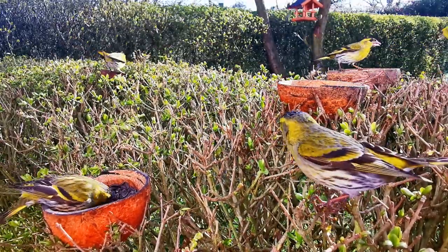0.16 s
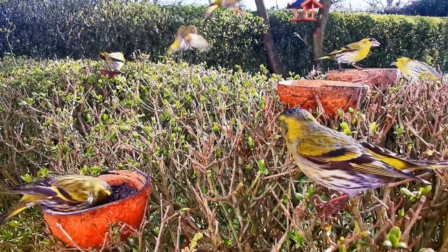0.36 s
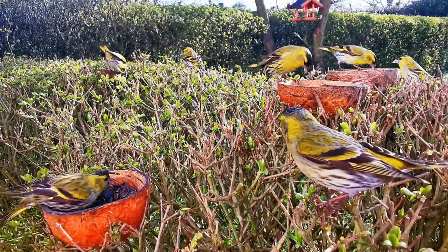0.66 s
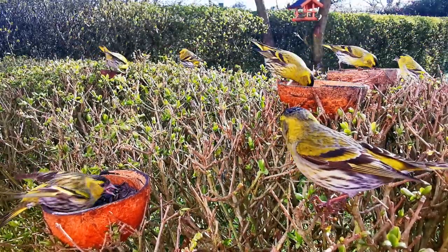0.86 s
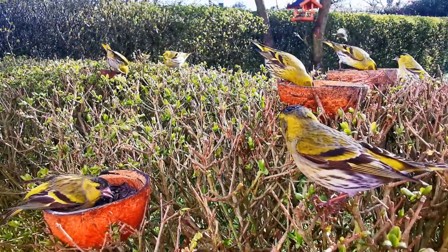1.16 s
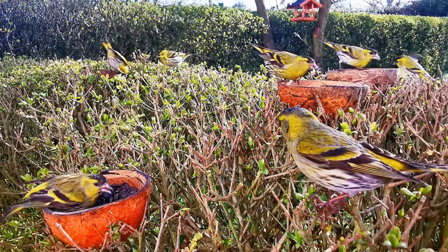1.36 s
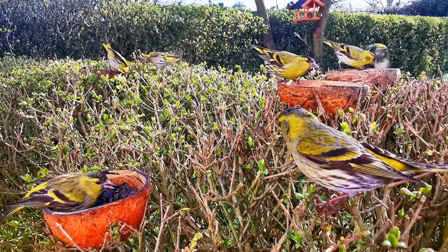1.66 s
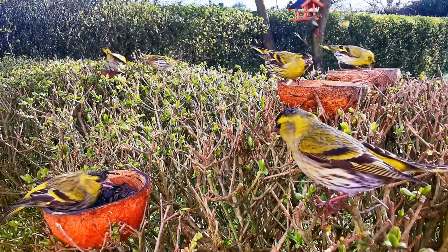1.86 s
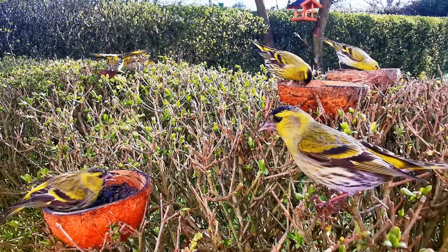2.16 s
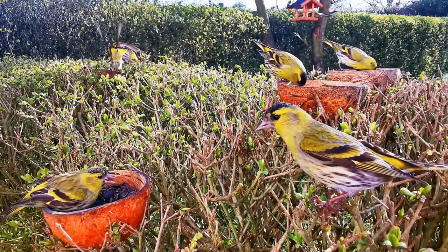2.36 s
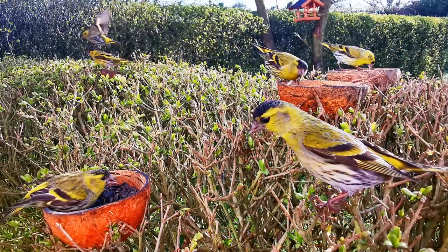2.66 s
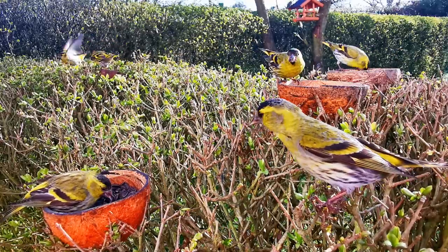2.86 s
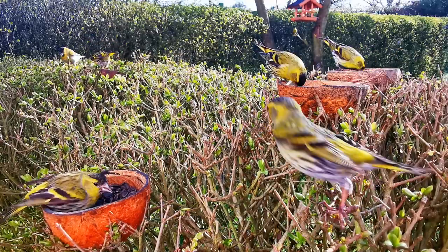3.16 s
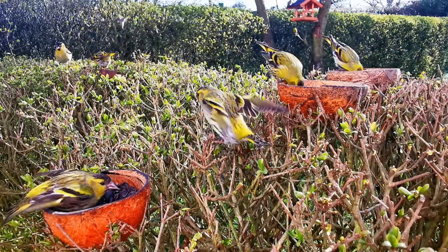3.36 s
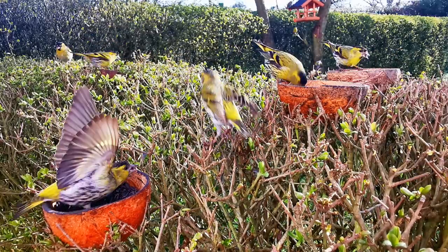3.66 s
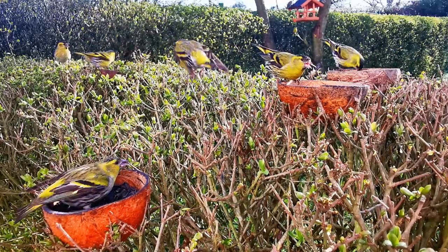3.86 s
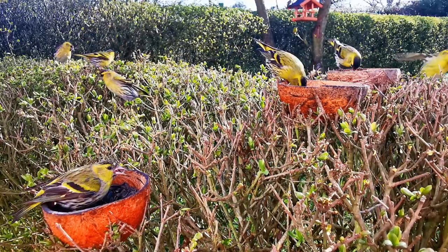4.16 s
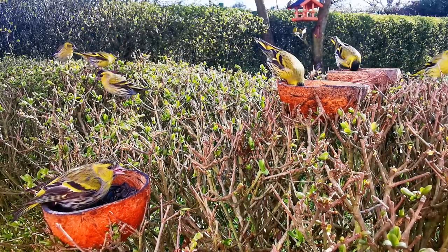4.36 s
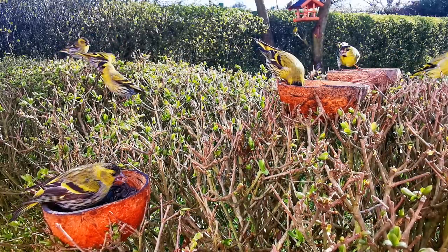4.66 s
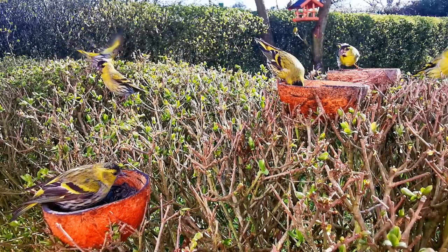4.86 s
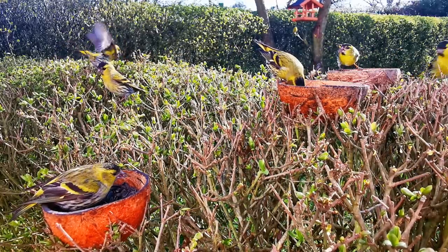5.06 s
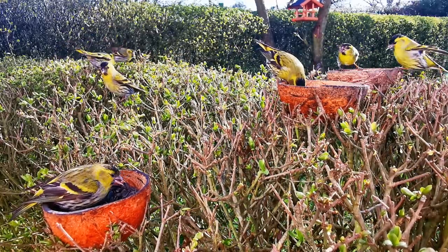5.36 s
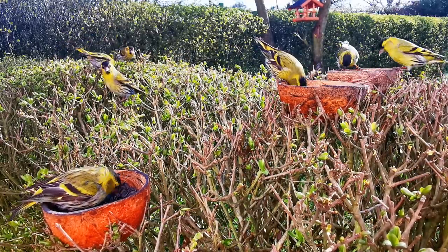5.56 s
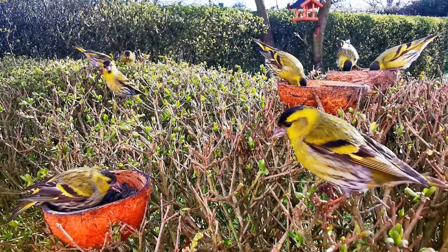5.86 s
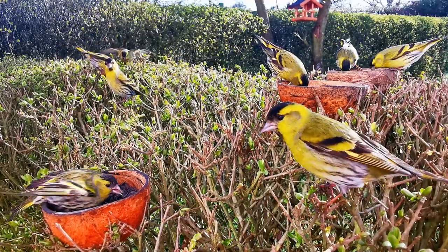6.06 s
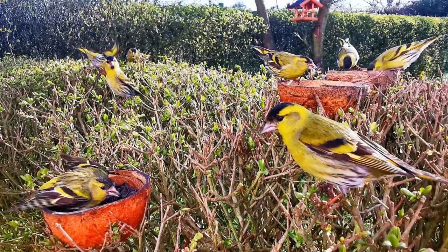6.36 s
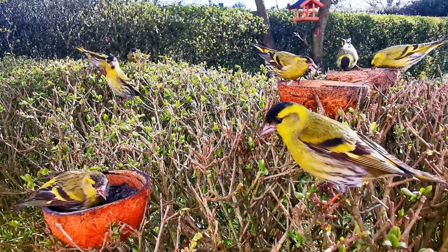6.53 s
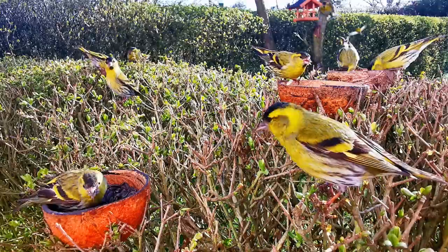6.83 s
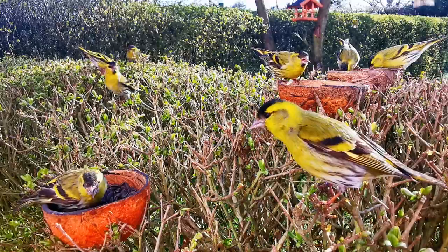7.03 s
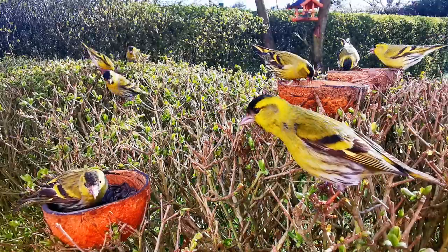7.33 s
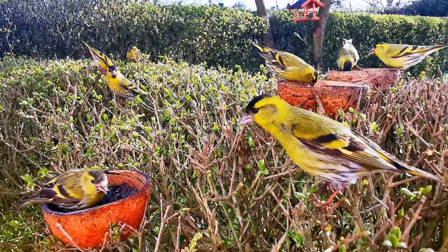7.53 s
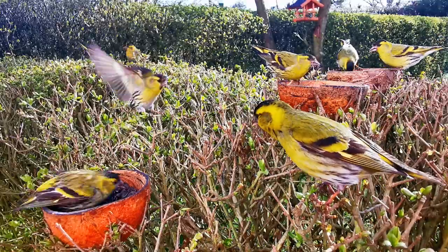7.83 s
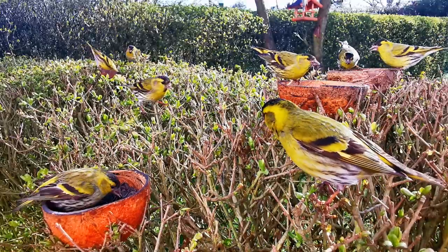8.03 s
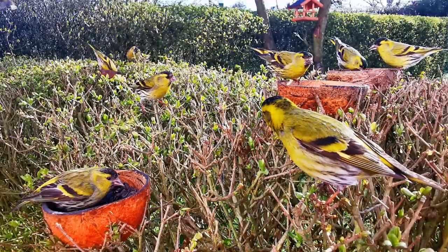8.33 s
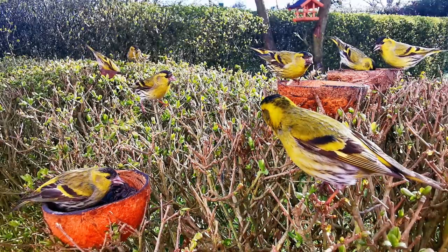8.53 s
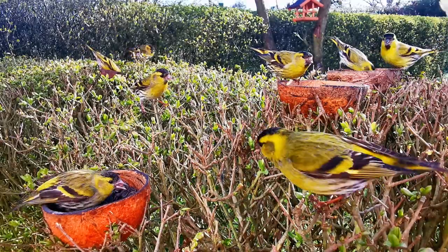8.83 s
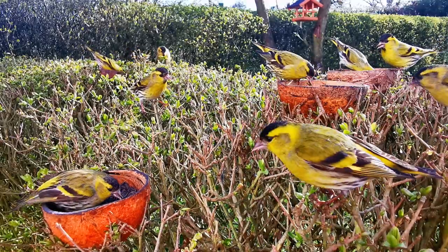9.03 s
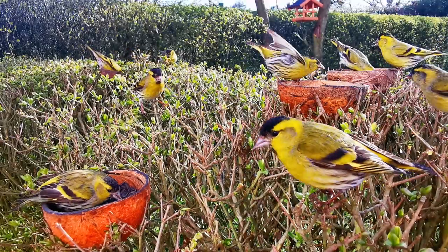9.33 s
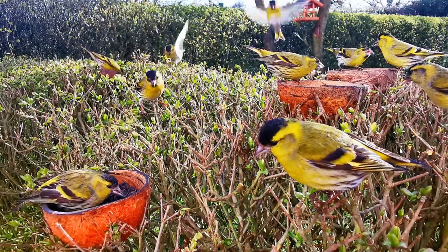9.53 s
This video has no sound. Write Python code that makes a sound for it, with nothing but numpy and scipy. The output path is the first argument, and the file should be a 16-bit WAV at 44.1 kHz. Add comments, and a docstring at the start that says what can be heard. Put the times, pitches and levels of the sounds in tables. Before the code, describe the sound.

Small finches feed close by on a garden hedge, over soft rustling of feathers and leaves, faint distant twitter and a light low wind rumble on the microphones. It opens with a dull flutter of wings and two harsh rasps. Rapid trills of high falling chirps run from 0.4 to 0.9 seconds and from 1.3 to 2.7, ending in thin gliding whistles and more flapping. Seed husks crack with tiny sharp snaps, clustered around 3.4 to 3.9 seconds and 5.6 to 6.2, the sharpest near 5.9. An animal wails faintly far off around 3.5, 4.5 and 6.5 seconds. Short dry calls and softer chirps scatter from 4.5 onward. A bright whistle stands out at 7.3, followed by wingbeats, a small gust, whistles and another trill with seed clicks from 8.5 to 9. Dry calls and wing swishes close it near 9.7. The calls carry a slight short echo.

```python
"""Finches at a garden feeder

Small finches crowd a feeder on a hedge, heard by two spaced microphones in a light wind. Oscillation of
the syrinx gives trills of falling chips and whistles, often from both of its sides at once; its flutter
chops the breath into rasps. Cracked seed husks ring briefly and beating wings push puffs of air.
An animal wails far off, and the hedge and house walls reflect the calls."""
import sys
import numpy as np
from scipy import signal
from scipy.io import wavfile
from scipy.ndimage import uniform_filter1d

SR = 44100
rng = np.random.default_rng(int(sys.argv[2]) if len(sys.argv) > 2 else 0)


def wrap_up_sound(samples):
    """Save the sound to the file named by the first command line argument, as 16-bit audio."""
    columns = np.atleast_2d(samples).T
    # keep every value between -1 and 1, then stretch to whole-number steps
    tamed = np.clip(columns, -1, 1)
    steps = np.round(tamed * 32767).astype(np.int16)
    wavfile.write(sys.argv[1], SR, steps)


N = 427329
T = np.arange(N) / SR

# Breeze on the microphones: t/s, low eddies/dB, brighter rumble/dB
BREEZE = [(0.0, -53, -56), (0.78, -65.5, -74), (1.78, -59.5, -63), (2.19, -62, -66.5), (2.62, -58.5, -60.5),
          (3.75, -66.5, -71), (4.07, -61.5, -61), (4.37, -63.5, -75), (5.34, -64.5, -80.5),
          (6.74, -61.5, -62), (7.31, -61.5, -67), (7.72, -47.5, -59), (8.39, -59.5, -72),
          (9.69, -59.5, -74)]
# Rushes of air from gusts and nearby wings: start/s, duration/s, low eddies/dB, brighter rumble/dB
RUSHES = [(-.15, 0.44, -61, -49), (0.247, 0.17, -57, -64), (0.437, 0.21, -59, -54.5),
          (1.287, 0.29, -59, -68), (1.595, 0.48, -67, -61.5), (2.45, 0.55, -59, -63.5),
          (3.332, 0.15, -60.5, -91), (3.826, 0.23, -58.5, -54.5), (4.004, 0.31, -50, -54),
          (5.57, 0.39, -55, -98), (6.2, 0.5, -66.5, -63), (6.678, 0.48, -56.5, -61.5),
          (7.203, 0.21, -64, -96), (7.373, 0.54, -47.5, -69), (7.89, 0.36, -50, -55),
          (8.404, 0.27, -69, -60.5), (8.74, 0.42, -56, -70), (9.267, 0.2, -58, -87),
          (9.527, 0.32, -62, -53)]
# Activity of the flock: t/s, rustle of feathers and leaves/dB, distant twitter/dB
BUSTLE = [(0.0, -42.5, -66), (0.16, -59.5, -88), (0.6, -62.5, -97), (0.9, -72, -92), (1.4, -62.5, -67.5),
          (2.3, -63.5, -68), (2.67, -58.5, -60), (3.1, -70, -84), (4.02, -63, -86), (4.4, -71, -77),
          (5.2, -70.5, -75.5), (5.8, -64, -70.5), (6.15, -68.5, -88.5), (6.45, -68.5, -69.5),
          (7.3, -64, -78.5), (7.77, -53, -67), (8.0, -61, -75.5), (8.36, -63, -74.5), (8.85, -63, -72.5),
          (9.1, -67, -97), (9.55, -62, -70.5), (9.69, -57, -67)]
# Spectrum of the rustle: f/Hz, relative spectral density/dB
RUSTLE_SPECTRUM = [(500, 3), (900, -11), (1500, -19.5), (2500, 8.5), (5000, -15.5), (8000, -6.5),
                   (11000, -2), (15500, -9)]
# Distant wails: start/s, duration/s, top f/Hz, top level/dB
WAILS = [(3.429, 0.6, 714, -57), (4.458, 0.57, 689, -58.5), (6.393, .58, 689, -60), (6.74, .36, 731, -60.5),
         (8.8, 0.43, 720, -69.5)]
# Arch of every wail: fraction of duration, fraction of top frequency, level re top/dB
WAIL_ARCH = [(0, .85, -17), (.11, .955, -5), (.4, 1.0, 0), (.7, .97, -3), (.92, .89, -9), (1, .82, -18)]
# Single wing strokes close by: t/s, level/dB
WING_STROKES = [(0.1054, -56), (0.3725, -52), (0.6394, -59), (1.3974, -52), (2.0822, -58), (2.5405, -54.5),
                (2.615, -50.5), (2.6707, -54), (2.7232, -51.5), (2.7721, -56), (4.1081, -57),
                (4.138, -55.5), (5.655, -54), (5.7117, -51.5), (5.773, -52), (5.8277, -52.5),
                (6.4443, -51.5), (7.6116, -51.5), (7.829, -47.5), (8.0366, -55.5), (8.1194, -63),
                (9.248, -59), (9.3723, -49.5), (9.4918, -63), (9.6163, -47)]
# Flapping at take-off and landing: first stroke/s, last stroke/s, first level/dB, last level/dB
FLAP_RUNS = [(0.068, 0.106, -37, -42.5), (0.505, 0.583, -55, -70), (1.642, 1.78, -65, -61),
             (1.889, 1.93, -74, -64), (2.702, 2.78, -52, -58), (3.836, 3.87, -60, -69),
             (4.001, 4.24, -61, -68), (6.531, 6.613, -59, -66), (7.433, 7.517, -54, -50.5),
             (7.586, 7.706, -48, -77), (8.062, 8.102, -67, -58), (8.539, 8.703, -63, -61)]
# Husks cracking and beaks tapping the dish: t/s, level/dB, f/Hz, left minus right/dB
CRACKS = [(0.063, -43, 5470, -15), (0.637, -52, 11000, -10), (0.7002, -52, 10800, -15),
          (1.074, -43.5, 7760, -16), (2.0822, -52, 7650, -11), (2.7721, -56, 10700, -15),
          (2.856, -51.5, 10400, -17), (3.3932, -40, 9000, -10), (3.6196, -41, 10600, 5),
          (3.7803, -46.5, 9980, 6), (3.8437, -36.5, 6640, 6), (4.107, -49, 5480, 9),
          (5.5944, -53, 9820, -12), (5.6135, -37.5, 8700, -17), (5.6261, -34.5, 9100, -6),
          (5.646, -43, 5100, -6.0), (5.875, -29, 8500, 5), (6.0601, -60, 7740, -13),
          (6.1745, -36, 8800, -9), (6.6145, -44, 11300, -7), (8.2023, -36.5, 7100, -9),
          (8.7065, -48, 7350, 0.0), (8.742, -44.5, 6440, -1), (8.7847, -44.5, 9030, -7),
          (8.8262, -46, 7960, -16), (8.8827, -52, 10900, -19), (8.9466, -50.5, 8250, -17),
          (9.5492, -51, 11000, -28)]
# Throat resonances: f/Hz, bandwidth/Hz, gain/dB
THROAT_FORMANTS = [(1663, 334, -0.5), (2850, 440, 3.5)]
# Squabbling rasps: t/s at start, turn and end; beak level/dB at the same three;
# throat level/dB, left lag/ms, beak f/Hz, beak bandwidth/Hz
RASPS = [(0.0, 0.09, 0.087, -44.5, -53.5, -69, -41.5, -.2, 4320, 2100),
         (0.209, 0.295, 0.34, -52.5, -35.5, -38.5, -41, -.2, 4820, 1300),
         (2.332, 2.447, 2.52, -54, -47, -55, -87, -.4, 5100, 700),
         (5.191, 5.23, 5.27, -58, -59, -58, -75, .1, 4800, 1800),
         (6.72, 6.79, 6.88, -56.5, -54, -66, -65, .2, 4560, 1680)]
# Short dry "tet" calls: t/s, level/dB, beak f/Hz, relative throat level/dB
TETS = [(1.144, -60, 5740, 3.5), (2.1297, -46.5, 4770, -27.5), (2.907, -53, 3940, -21),
        (4.0233, -53.5, 4140, 1), (4.7865, -57.5, 4400, 3), (4.906, -55, 4600, -6),
        (5.018, -57.5, 4250, -6), (5.425, -52, 4100, -28), (5.491, -57, 4400, -24), (5.56, -56, 4540, -19),
        (5.7, -47.5, 3750, -23), (5.843, -46.5, 4030, -12), (5.918, -47, 4300, -18),
        (5.9993, -49.5, 4280, -8), (6.1963, -50, 4740, 0.5), (6.301, -64, 4620, -30),
        (6.4455, -47.5, 4900, -5), (6.47, -52, 4540, 3), (6.9481, -53, 4360, -6), (7.0194, -52, 4130, -25),
        (7.051, -56.5, 5109, 1), (7.089, -51.5, 4200, -7), (7.2235, -52, 4900, -28), (7.391, -53, 4570, -8),
        (7.473, -55, 4040, -2), (7.6191, -48.5, 4400, -8), (8.118, -42.5, 4800, 2), (8.266, -49, 4800, -5),
        (8.5909, -57, 4580, -25), (9.25, -44, 4070, -6), (9.3697, -43, 4400, -4.5), (9.4424, -54, 4800, -2),
        (9.483, -44.5, 4700, -1), (9.553, -49, 4400, -20), (9.6594, -57, 4210, -9)]
# Whistled glides: t/s at start, turn and end; f/Hz and then level/dB at the same three;
# left lag/ms, second partial/dB, third partial/dB
WHISTLES = [ (0.116, 0.128, 0.16, 3260, 3174, 3220, -67, -60, -73, 0, -27, -30),
            (2.127, 2.221, 2.31, 1887, 2382, 2500, -59, -53.5, -56.5, 0.32, 1, -8),
            (2.135, 2.181, 2.37, 2420, 2950, 3310, -50.5, -54, -43, 0.27, -10, -12),
            (2.325, 2.369, 2.49, 5830, 5030, 5020, -56, -51, -46.5, -.4, -42, -40),
            (2.42, 2.48, 2.5, 2780, 3670, 3820, -83, -55, -65, -0.022, -14, -25),
            (2.619, 2.641, 2.68, 6170, 5380, 5070, -58, -42.5, -60, .3, -15, -40),
            (2.636, 2.658, 2.67, 4100, 4300, 4272, -62, -38, -67, 0.07, -40, -40),
            (2.7, 2.7, 2.73, 5678, 5470, 5100, -57, -41, -71, .3, -35, -40),
            (3.592, 3.643, 3.77, 2390, 3260, 3600, -55, -58.5, -84, -0.41, -8, -32),
            (3.606, 3.655, 3.78, 2110, 2546, 2790, -66, -54.5, -72, -0.45, -3.5, -35),
            (4.041, 4.08, 4.09, 1243, 2000, 2000, -62.5, -68.5, -78, -0.54, 12.5, 4.5),
            (4.12, 4.15, 4.35, 2791, 2860, 2744, -78, -66, -67, 0.27, -40, -40),
            (4.82, 4.976, 5.14, 4110, 4230, 3930, -68, -70, -74, 0.19, -40, -40),
            (5.229, 5.287, 5.32, 3450, 4920, 5000, -56, -55, -70, .1, -40, -40),
            (5.24, 5.249, 5.275, 3120, 2864, 2270, -68, -62, -67, 0, -30, -30),
            (6.323, 6.372, 6.5, 3530, 3950, 3020, -61, -59.5, -60, .32, -26, -35),
            (6.324, 6.366, 6.4, 5300, 5570, 5749, -62, -58, -73, 0.3, -35, -40),
            (6.805, 6.831, 6.862, 3230, 4130, 5050, -57, -54, -62, 0.19, -40, -40),
            (6.842, 6.867, 6.885, 2450, 2420, 2420, -64, -57, -70, -0.12, -5, -21),
            (7.241, 7.298, 7.32, 3550, 4170, 4470, -69, -45.5, -70, .32, -57, -40),
            (7.242, 7.274, 7.315, 4820, 4755, 5590, -50, -37, -50, .32, -23, -40),
            (7.602, 7.764, 7.78, 4820, 4510, 4750, -52.5, -54, -75, .25, -32, -40),
            (7.932, 7.964, 8.0, 3330, 3460, 3379, -53, -67, -63, 0, -35, -40),
            (7.95, 7.952, 8.03, 6760, 6900, 6915, -75, -59, -78, 0, -25, -40),
            (8.14, 8.273, 8.29, 3997, 3730, 3890, -47, -52.5, -58, -.34, -23, -29),
            (8.281, 8.305, 8.335, 2000, 2030, 2220, -58, -44, -58, -.16, -4.5, -5),
            (8.33, 8.373, 8.39, 2250, 2700, 2820, -59, -44.5, -57, -0.14, -6.5, -19),
            (8.363, 8.379, 8.39, 1487, 1370, 1360, -62, -53, -78, -0.23, 3, -11),
            (8.437, 8.472, 8.48, 3700, 4349, 4600, -53, -60, -73, -0.072, -35, -40),
            (9.579, 9.604, 9.635, 1936, 2070, 2060, -67, -59.5, -74, -0.021, 10.5, 0),
            (9.652, 9.663, 9.688, 2520, 2840, 3140, -72, -63, -51, 0, -10, -28), ]
# Singer of each trill: from t/s, lead of chip onset/s, mean fall/(Hz/s), closing f/Hz,
# second partial/dB, third partial/dB
SINGERS = [(0.0, 0.01, 61500, 2440, -40, -50), (1.2, .006, 100100, 2235, -25.5, -23.5),
           (4.3, 0.0087, 79800, 2340, -42, -59), (5.2, 0.0096, 70200, 2250, -24, -45),
           (7.3, .01, 79300, 2270, -35, -43), (8.5, 0.0068, 84800, 2360, -29, -45)]
# Falling chips: t/s, level/dB, starting f/Hz
CHIPS = [(0.4193, -50.5, 3660), (0.4748, -40, 4310), (0.5487, -37.5, 4330), (0.622, -37, 4390),
         (0.701, -38, 4290), (0.7708, -48, 3900), (0.8664, -46.5, 4030), (1.3351, -46, 4590),
         (1.394, -41, 4540), (1.4492, -39, 4690), (1.5102, -40, 4470), (1.574, -40.5, 4460),
         (1.6355, -39.5, 4490), (1.6976, -39.5, 4450), (1.7614, -41, 4530), (1.829, -41.5, 4440),
         (1.901, -43, 4380), (1.973, -44, 4650), (1.99, -43.5, 4300), (2.0523, -46.5, 4540),
         (2.08, -46.5, 4600), (2.1424, -42, 4620), (2.202, -43.5, 4630), (2.2599, -41, 4530),
         (2.3244, -42, 4320), (2.3922, -41.5, 4570), (2.5099, -46.5, 4580), (2.5942, -46.5, 4710),
         (2.6122, -49, 4500), (2.6673, -46, 4840), (4.4545, -50, 4230), (4.5472, -47.5, 3910),
         (4.6561, -48.5, 3720), (5.322, -52, 3810), (5.434, -53.5, 3750), (5.677, -48, 4200),
         (5.7796, -45, 3930), (5.881, -49, 4190), (7.5257, -58, 4250), (7.6744, -48.5, 4250),
         (7.7512, -47, 4240), (7.8303, -45, 4380), (7.9184, -48, 4220), (8.566, -55, 4320),
         (8.6244, -50, 4260), (8.681, -50, 4200), (8.744, -48.5, 4300), (8.8064, -49.5, 4200),
         (8.8693, -48.5, 4010), (8.9362, -49.5, 4110), (9.011, -50.5, 3970)]

TOP_HZ = 16000


def undb(db):
    return 10 ** (np.asarray(db) / 20)


def unit(x):
    return x / np.sqrt(np.mean(x ** 2))


def band(x, hz, width):
    """Second-order resonance with unit gain at its centre."""
    return signal.lfilter(*signal.iirpeak(min(hz, .45 * SR), hz / width, SR), x)


def hiss(hz, width):
    """White noise shaped by one resonance, at unit RMS."""
    return unit(band(rng.standard_normal(N), hz, width))


def walk(rate):
    """Slow random modulation: values held for 1 / rate s and smoothed twice; spread near 1."""
    hold = int(SR / rate)
    steps = np.repeat(rng.standard_normal(N // hold + 1), hold)
    return 1.5 * uniform_filter1d(uniform_filter1d(steps, hold), hold)[:N]


def add(out, s, x):
    """Superposition: x joins out from time s."""
    i = max(int(s * SR), 0)
    out[..., i:i + x.shape[-1]] += x[..., :N - i]


def place(out, s, x, lag_ms):
    """Path difference: x reaches the left microphone lag_ms after the right."""
    add(out[0], s + max(lag_ms, 0) / 1000, x)
    add(out[1], s + max(-lag_ms, 0) / 1000, x)


def harmonic_glides(calls, traits, fade_s, waver, tremble_db):
    """Harmonic series on (t, f, level) contours, slightly modulated in frequency and amplitude."""
    out = np.zeros((2, N))
    drift = 1 + waver * walk(150)
    tremble = undb(tremble_db * (walk(60) + walk(400)) / np.sqrt(2))
    for call, (lag_ms, *partials_db) in zip(calls, traits):
        s, hz, db = np.transpose(call)
        span = slice(int(s[0] * SR), int(s[-1] * SR))
        t = T[span]
        pitch = uniform_filter1d(np.interp(t, s, hz), len(t) // 6, mode="nearest")
        phase = 2 * np.pi * np.cumsum(pitch * drift[span]) / SR
        partials = enumerate([0, *partials_db], 1)
        tone = sum(undb(d) * np.sin(k * phase) for k, d in partials if k * hz.max() < TOP_HZ)
        fade = np.clip(np.minimum(t - s[0], s[-1] - t) / fade_s, 0, 1)
        place(out, s[0], np.sqrt(2) * undb(np.interp(t, s, db)) * tone * fade * tremble[span], lag_ms)
    return out


def airflow(column, skew=1.09, sharpness=2.55):
    """Envelope of one layer of turbulence: the breeze plus rushes that swell and die away."""
    breeze = np.array(BREEZE)
    gain = undb(np.interp(T, breeze[:, 0], breeze[:, column]))
    for row in RUSHES:
        u = np.clip((T - row[0]) / row[1], 0, 1)
        gain += undb(row[column + 1]) * np.abs(np.sin(np.pi * u ** skew)) ** sharpness
    return gain


def wind(wingbeat_hz=21.68):
    """Turbulence of wind and wing wash: low noise, alike on both sides, pulsed at the wingbeat rate."""
    eddies, rumble = airflow(1), airflow(2)
    beat = 2 * np.pi * np.cumsum(wingbeat_hz * undb(1.5 * walk(6))) / SR
    flutter = 0.41 + 0.4 * unit(np.exp(1.86 * np.cos(beat)))
    thump = unit(band(np.exp(3 * np.cos(beat)), 70, 67)) * undb(4.67 * walk(12))
    low = lambda: eddies * (hiss(42.3, 14.7) + 0.51 * hiss(80, 15.5) + 0.13 * hiss(120, 23))
    bright = lambda: rumble * undb(1.7 * walk(25)) * flutter * (hiss(201.4, 75.3) + .06 * hiss(520, 510))
    mid = low() + 1.12 * eddies * thump + bright()
    side = low() + 1.2 * bright()
    return undb([[1.3], [-1.3]]) * (mid + 0.34 * side * np.array([[1], [-1]]))


def bustle():
    """Incoherent sources sum to noise: rustle in flickering half-octave bands, and patchy far twitter."""
    s, rustle_db, flock_db = np.transpose(BUSTLE)
    hz, db = np.transpose(RUSTLE_SPECTRUM)
    rustle, shared_flicker = np.zeros((2, N)), walk(21)
    for f in 500 * 2 ** np.arange(0, 5, .5):
        density_db = np.interp(np.log(f), np.log(hz), db) + 1.2 * shared_flicker + 1.1 * walk(9)
        rustle += undb(density_db) * np.sqrt(f / 16000) * np.array([hiss(f, f / 2.1), hiss(f, f / 1.95)])
    flock = lambda: sum(undb(4.5 * walk(25)) * hiss(f, 250) for f in (2900, 3500, 4200, 4900))
    twitter = np.array([flock(), flock()])
    return rustle * undb(np.interp(T, s, rustle_db)) + twitter * undb(np.interp(T, s, flock_db))


def echoes(x, t60_s=0.25, gain_db=2.5, wall_s=0.0385, wall_db=-11):
    """Reflection: sparse returns from the hedge decay exponentially; a house wall adds a smeared slap."""
    t = T[:int(.35 * SR)]
    twigs = 7.5 * np.exp(-t / 0.0053)  # branches right beside the birds
    hedge = (twigs + undb(-60 * t / t60_s)) * (t > .001)
    wall = undb(wall_db) * np.exp(-((t - wall_s) / 0.0052) ** 2)
    taps = rng.standard_normal((2, len(t))) * (rng.random((2, len(t))) < .015) * (hedge + wall)
    response = undb(gain_db) * unit(taps) / np.sqrt(len(t))
    return signal.fftconvolve(x[None], response, axes=1)[:, :N]


def wails(lag_ms=.3, overtones_db=(-26, -26, -21, -25, -27)):
    """Periodic voicing of a distant animal: a tone with weak overtones arches in pitch and level."""
    arches = [[(s + u * length, hz * ratio, db + relative_db) for u, ratio, relative_db in WAIL_ARCH]
              for s, length, hz, db in WAILS]
    traits = [(lag_ms, *overtones_db)] * len(WAILS)
    return harmonic_glides(arches, traits, fade_s=0.015, waver=0.0054, tremble_db=2.1)


def wing_swishes():
    """Flow noise of feathers: each stroke is a soft broadband swish, louder on the right."""
    envelope, swish = np.zeros(N), np.hanning(int(.018 * SR))
    for s, db in WING_STROKES:
        add(envelope, s - .005, undb(db) * swish)
    return envelope * np.array([0.42 * hiss(6900, 13000), 1.77 * hiss(6300, 14700)])


def wing_flaps(flap_hz=24.1, scatter_db=2):
    """Displacement of air: each downstroke of a run throws a short dull puff."""
    envelope, puff = np.zeros(N), np.hanning(int(0.02 * SR))
    for first, last, *ends_db in FLAP_RUNS:
        strokes = np.arange(first, last + .5 / flap_hz, 1 / flap_hz)
        for s, chance in zip(strokes, rng.standard_normal(12)):
            db = np.interp(s, [first, last], ends_db) + scatter_db * chance
            add(envelope, s - .008, undb(db) * puff)
    return envelope * (hiss(160, 220) + 0.041 * hiss(500, 600))


def seed_cracks():
    """Impulse excitation: a snap rings the husk as a damped sine, with a tail of splinter noise."""
    out, t = np.zeros((2, N)), T[:2048]
    for s, db, hz, pan_db in CRACKS:
        snap = 2 * np.exp(-t / 0.00035) * np.sin(2 * np.pi * hz * t)
        splinters = 0.52 * np.exp(-t / 0.0074) * band(rng.standard_normal(len(t)), hz, 4900)
        add(out, s, undb([[db + pan_db / 2], [db - pan_db / 2]]) * (snap + splinters))
    return out


def beak(breath, hz, width):
    """Resonance of the beak: one strong formant and a weak one a fifth above."""
    return unit(band(band(breath, hz, width), hz, 2 * width) + 0.057 * band(breath, 1.5 * hz, 2000))


def rasps_and_tets(flutter_hz=210.5, tet_s=0.027):
    """Source and filter: breath chopped by an uneven flutter of the syrinx rings the beak and throat."""
    cycle = np.cumsum(flutter_hz * undb(1.1 * walk(60))) / SR % 1
    breath = unit(rng.standard_normal(N) * (1.4 + np.exp(-cycle / 0.34)))
    throat = unit(sum(undb(db) * band(band(breath, hz, w), hz, 2 * w) for hz, w, db in THROAT_FORMANTS))
    out = np.zeros((2, N))
    for *contour, throat_db, lag_ms, hz, width in RASPS:
        s, db = contour[:3], contour[3:]
        span = slice(int(s[0] * SR), int(s[-1] * SR))
        voice = undb(np.interp(T[span], s, db)) * beak(breath[span], hz, width)
        voice += undb(throat_db) * throat[span]
        place(out, s[0], signal.windows.tukey(len(voice), .1) * voice, lag_ms)
    for s, db, hz, throat_db in TETS:
        span = slice(int(s * SR), int((s + tet_s) * SR))
        voice = 0.57 * beak(breath[span], hz, 1880) + 0.34 * undb(throat_db) * throat[span]
        add(out, s - .005, undb(db) * np.hanning(len(voice)) ** 0.26 * voice)
    return out


def whistles():
    """Two independent oscillators: each side of the syrinx can glide on a pitch of its own."""
    glides = [np.reshape(row[:9], (3, 3)).T for row in WHISTLES]
    traits = [row[9:] for row in WHISTLES]
    return harmonic_glides(glides, traits, fade_s=0.00072, waver=0.0116, tremble_db=1.68)


def chips(lag_ms=.36):
    """Frequency sweep: each chip is a nearly pure tone that falls ever more steeply as it fades."""
    out = np.zeros((2, N))
    for s, db, hz in CHIPS:
        _, lead_s, fall, end_hz, second_db, third_db = [row for row in SINGERS if row[0] <= s][-1]
        u = np.linspace(0, 1, int((hz - end_hz) / fall * SR))
        phase = 2 * np.pi * np.cumsum(end_hz + (hz - end_hz) * (1 - u ** 1.4)) / SR
        envelope = np.abs(np.sin(np.pi * u ** 0.72)) ** 0.71
        tone = np.sin(phase) + undb(second_db) * np.sin(2 * phase) + undb(third_db) * np.sin(3 * phase)
        place(out, s - lead_s, undb(db) * envelope * tone, lag_ms)
    return out


def scene():
    """Superposition of all direct sound and the reflections of the voices."""
    calls = whistles() + rasps_and_tets()
    trills, wail = chips(), wails()
    voices = calls + trills + wail * undb([[-2.5], [2.5]])
    reflections = echoes(0.56 * calls[1] + 1.25 * trills[1] + 0.25 * wail[1])
    return voices + reflections + wing_swishes() + wing_flaps() + seed_cracks() + wind() + bustle()


def record(dry):
    """Band limiting: a steep low-pass filter removes the highest treble."""
    return signal.sosfilt(signal.ellip(10, .2, 70, TOP_HZ, fs=SR, output="sos"), dry)


dry = scene()
out = record(dry)
wrap_up_sound(out)
```